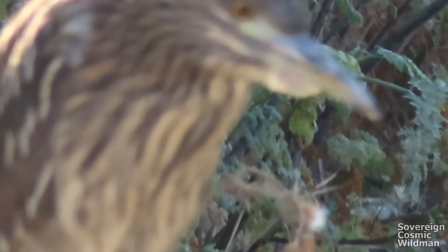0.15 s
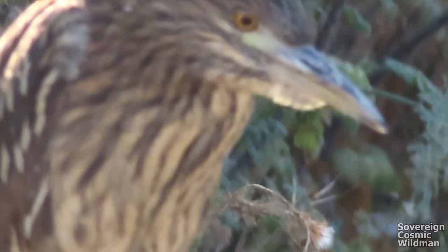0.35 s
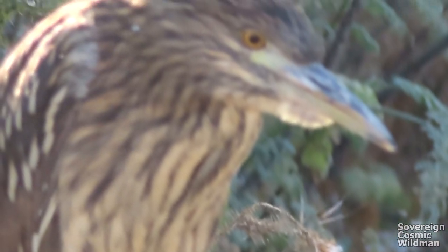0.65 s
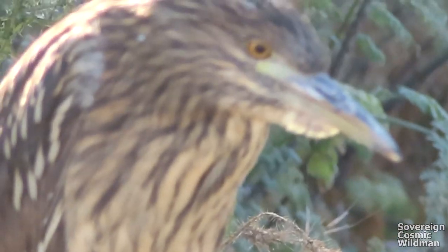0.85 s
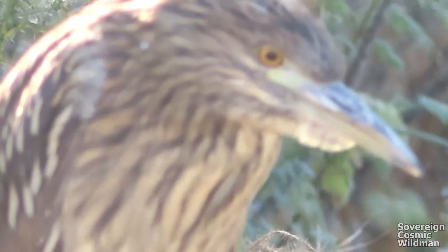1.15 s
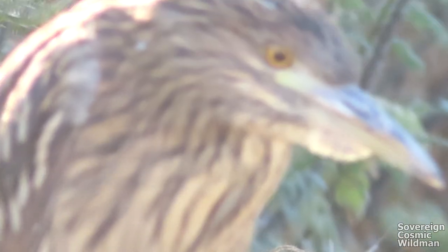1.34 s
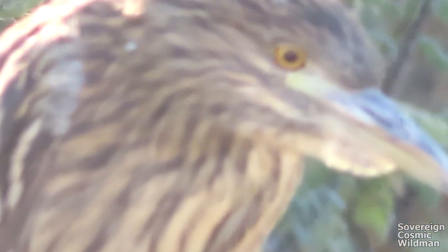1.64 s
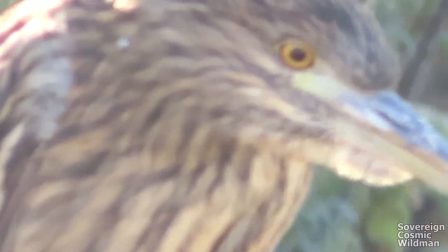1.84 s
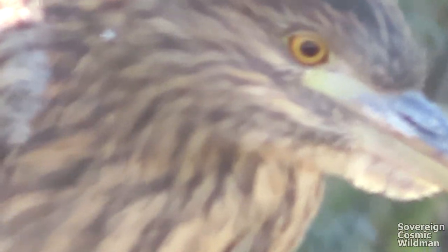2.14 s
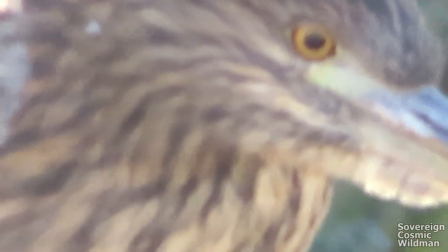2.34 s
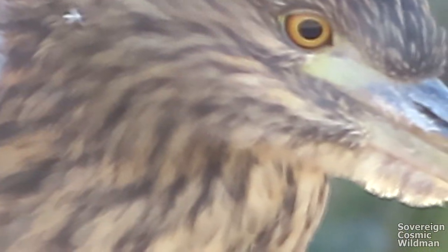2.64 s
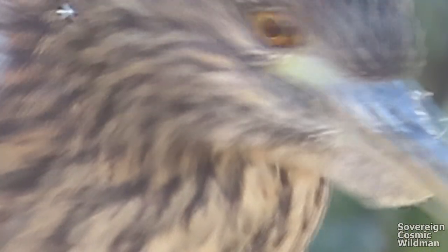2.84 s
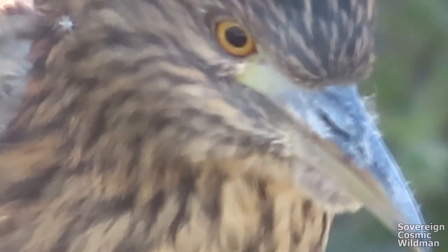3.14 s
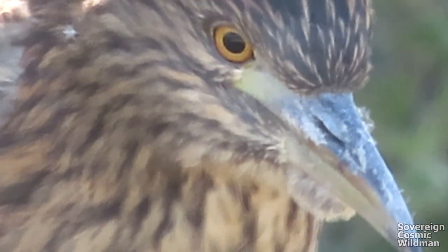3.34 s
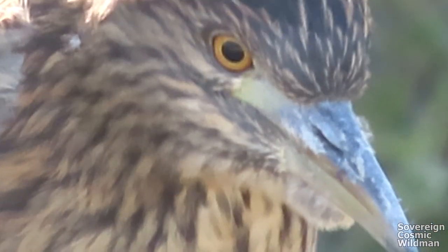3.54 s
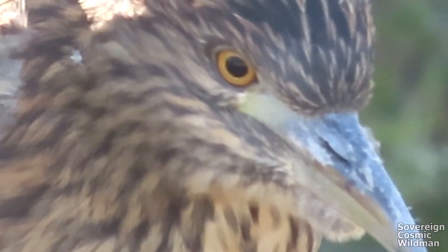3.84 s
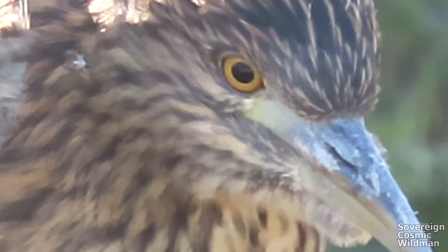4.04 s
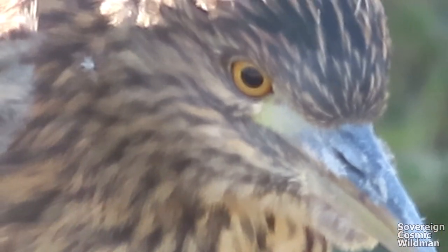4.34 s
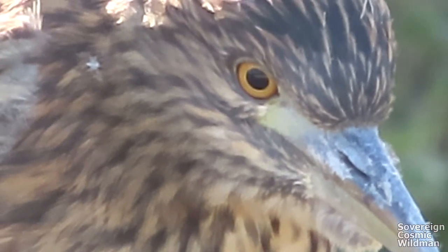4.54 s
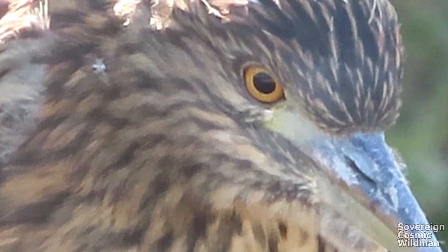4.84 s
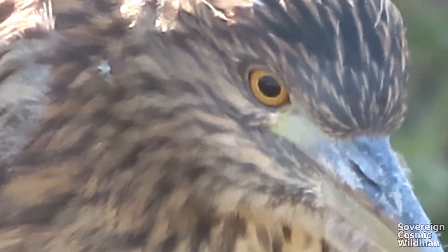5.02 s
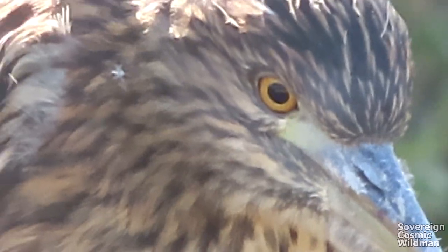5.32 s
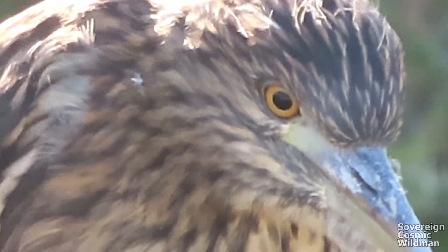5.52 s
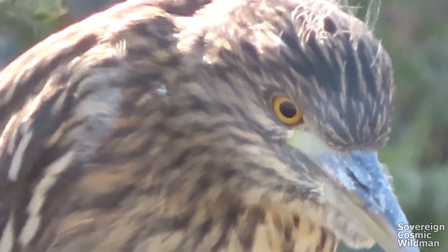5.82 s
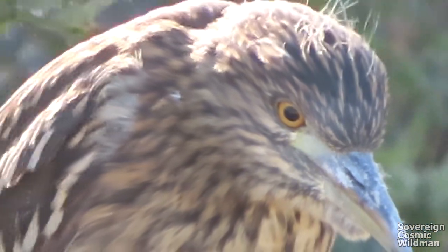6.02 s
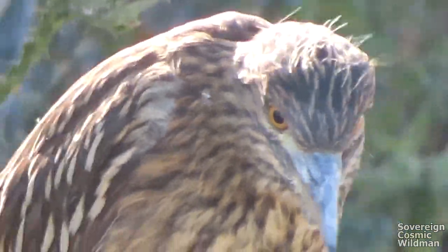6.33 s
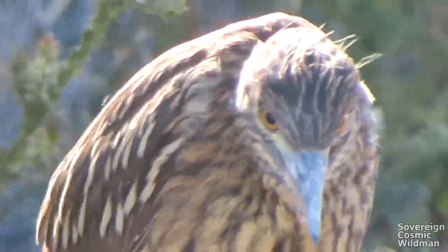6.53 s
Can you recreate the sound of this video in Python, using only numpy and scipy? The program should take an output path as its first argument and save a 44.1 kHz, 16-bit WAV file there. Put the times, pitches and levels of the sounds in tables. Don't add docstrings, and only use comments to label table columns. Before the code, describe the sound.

Zoom motor whine with gear clicks stops in a sharp snap, then faint ticking and bird chirps over a steady distant engine rumble.

```python
import sys
import numpy as np
from scipy import signal
from scipy.io import wavfile

SR = 44100
rng = np.random.default_rng(int(sys.argv[2]) if len(sys.argv) > 2 else 0)


def gain_from_decibels(decibels):
    exponent = np.asarray(decibels, float) / 20
    return 10 ** exponent


def digitize_waveform(pressure):
    field = np.atleast_2d(pressure).T
    bounded = np.clip(field, -1, 1)
    quanta = np.round(bounded * 32767).astype(np.int16)
    wavfile.write(sys.argv[1], SR, quanta)


N = 294367


def unit(x):
    return x / np.sqrt(np.mean(x ** 2) + 1e-20)


def in_time(rows):
    s, *columns = np.transpose(rows)
    return [np.interp(np.arange(N) / SR, s, c) for c in columns]


def at_hz(points, hz):
    points = np.array(points)
    return np.interp(np.log(hz), np.log(points[:, 0]), points[:, 1])


def drift(rate):
    r = np.exp(-80 * np.pi * rate / SR)
    white = rng.standard_normal(N // 40 + 2002)
    slow = signal.lfilter([1], [1, -2 * r, r * r], white)[2000:]
    return np.interp(np.arange(N) / 40, np.arange(len(slow)), unit(slow))


def resonate(x, peaks):
    out = 0
    for k, (hz, width, top_db) in enumerate(peaks):
        r = np.exp(-np.pi * width / SR)
        a = [1, -2 * r * np.cos(2 * np.pi * hz / SR), r * r]
        b = [(1 - r * r) / 2, 0, (r * r - 1) / 2]
        out = out + (-1) ** k * gain_from_decibels(top_db) * signal.lfilter(b, a, x)
    return out


def ring(pushes, modes):
    out = 0
    for k, (hz, level_db, t60) in enumerate(modes):
        r, w = gain_from_decibels(-60 / (t60 * SR)), 2 * np.pi * hz / SR
        b, a = [0, gain_from_decibels(level_db) * np.sin(w)], [1, -2 * r * np.cos(w), r * r]
        out = out + (-1) ** k * signal.lfilter(b, a, pushes + 1e-18)
    return out


def soften(x, hz):
    return signal.sosfilt(signal.butter(2, hz, fs=SR, output="sos"), x)


def pan(x, left_db):
    return x * gain_from_decibels(np.array([[left_db / 2], [-left_db / 2]]))


# time in seconds, speed in cycles per second.
SPEED = [(0.0, 23.8), (.5, 23.6), (1.0, 23.4), (1.75, 23.4), (2.6, 23.25), (3.4, 23.42), (4.0, 23.47),
         (6.0, 23.46), (6.68, 23.35)]
# time in seconds, base level of the orders in dB.
ENGINE = [(0.0, -42.5), (.62, -43), (.8, -41), (1.5, -42.5), (2.0, -42), (5.6, -41.5), (6.68, -41)]
# multiple of the cycle rate, level in dB.
ORDER_DB = [(1, -40), (2, 2), (3, -6), (4, -8), (5, -1), (6, -3), (7, -8.5), (8, -30.5), (9, -36),
            (10, -62), (11, -13.5), (12, -40), (13, -23.5)]


def engine():
    (hz,), (level_db,) = in_time(SPEED), in_time(ENGINE)
    cycle = 2 * np.pi * (np.cumsum(hz) / SR + 0.304)
    orders = np.zeros(N)
    for k, db in ORDER_DB:
        level = gain_from_decibels(db + 0.32 * min(k, 6) * drift(2.6))
        offset = 0.034 * k * drift(1.7) - 1.16 * (k in (4, 6))
        orders += level * np.cos(k * cycle + offset)
    return -np.sqrt(2) * gain_from_decibels(level_db) * orders


# frequency in Hz, width in Hz, level in dB.
WHINE = [(1480, 28, 3), (1687, 50, -2.5), (757, 71, 2.5)]


def zoom_drive():
    t = np.arange(N) / SR
    stop_s, fade_s, jerk_s = .337, .025, .029
    stop_db = -40 * np.clip((t - stop_s) / fade_s, 0, 5)
    jerk_db = 7.5 * np.clip(1 - (stop_s - t) / jerk_s, 0, 1)
    whine_db = -48.5 - 14 * t + jerk_db + stop_db
    whine = soften(unit(resonate(rng.standard_normal(N), WHINE)), 2500)
    rumble = unit(resonate(rng.standard_normal(N) * gain_from_decibels(1.3 * drift(21)), [(290, 380, 0)]))
    return gain_from_decibels(whine_db) * whine + gain_from_decibels(-56.5 + stop_db) * rumble


# start in seconds, peak in dB, ring in Hz, low thud in dB.
TEETH = [(0.016, -33, 857, 4), (0.044, -34, 730, -5), (0.075, -33.5, 870, -1), (0.113, -36, 755, -3),
         (0.149, -34.5, 970, 6.5), (0.164, -36, 810, -7), (0.196, -33, 732, -3), (0.215, -36, 1090, -1),
         (0.277, -34.5, 810, -3), (0.298, -38, 694, -2), (0.318, -33.5, 750, 3), (0.343, -31.5, 777, 6.5),
         (0.368, -36, 996, -20)]


def gear_teeth():
    out, t = np.zeros(N), np.arange(round(.04 * SR)) / SR
    swell = 1 - np.exp(-t / 0.00061)
    for s, db, hz, thud_db in TEETH:
        i = round(s * SR)
        tick = np.sin(2 * np.pi * hz * t) * np.exp(-t / 0.0039)
        thud = gain_from_decibels(thud_db) * np.sin(2 * np.pi * 340 * t) * np.exp(-t / 0.0036)
        out[i:i + len(t)] += gain_from_decibels(db + 3.5) * swell * (tick + thud)
    return out


def contacts(events, modes, gain_db, lasting_s, crunch, soft_hz, crack_db):
    low, upper, n = np.zeros(N), np.zeros(N), round(.015 * SR)
    fade = np.exp(-np.arange(n) / (lasting_s * SR))
    bursts = rng.standard_normal((len(events), n)) * crunch * fade
    for (s, db, upper_db), burst in zip(events, bursts):
        i = round(s * SR)
        blow = gain_from_decibels(db + gain_db) * np.append(1, burst[1:])
        low[i:i + n] += blow * np.append(1, np.full(n - 1, .4))
        upper[i:i + n] += blow * gain_from_decibels(upper_db)
    crack = gain_from_decibels(crack_db) * soften(upper + 1e-18, 2740)
    return soften(ring(low, modes[:1]) + ring(upper, modes[1:]), soft_hz) + crack


FOCUS_TICKS = [2, 5, 8, 11, 14, 17, 19, 22, 25, 28, 31, 33, 36, 38, 41, 43, 46, 48, 51, 53, 56, 58]
FOCUS_DB = [-36, -40, -33, -42, -36, -39, -37, -36, -36, -45, -35.5, -37, -32, -35, -32, -36.5, -36, -35,
            -34.5, -35.5, -37, -37.5]
# frequency in Hz, level in dB, t60 in seconds.
SHELL = [(438.6, 1, 0.1), (860, 5.5, 0.032), (952, 1, 0.03), (1112, 0.5, 0.016), (1820, -7.5, 0.03),
         (2820, -12, 0.036)]


def focus_steps():
    clock_start_s, tick_s, upper_db = .624, .03343, -41
    events = [(clock_start_s + tick_s * k, db, upper_db - db) for k, db in zip(FOCUS_TICKS, FOCUS_DB)]
    return contacts(events, SHELL, gain_db=-1.5, lasting_s=0.012, crunch=0.036, soft_hz=2200, crack_db=14)


# start in seconds, peak in dB, upper
# modes in dB.
TOUCHES = [(.392, -41.5, 6), (.624, -37.5, 5.5), (1.444, -48, 8), (2.216, -46.5, 6), (2.785, -37.5, 3),
           (3.165, -41, 5.5), (3.271, -36.5, -0.5), (4.358, -45, 8.5), (4.393, -44, 5.5), (4.45, -38.5, 2),
           (4.473, -36, -2), (4.655, -47.5, 10), (4.735, -49, 9.5), (4.898, -41.5, 7), (5.091, -37.5, 3.5),
           (5.387, -37.5, -3)]


def hand_touches():
    return contacts(TOUCHES, SHELL, gain_db=-1.0, lasting_s=0.0042, crunch=0.03, soft_hz=1640, crack_db=8)


# frequency in Hz, level in dB, t60 in seconds.
CAP = [(424, 11.5, 0.042), (694, -4, 0.006), (867, 3.5, 0.041), (1110, 4, 0.0077), (1394, 2, 0.011),
       (1620, 3.5, 0.0085), (2050, -7.5, 0.011), (2750, -9.5, 0.012), (3450, -9.5, 0.012),
       (4360, -10.5, 0.0042), (5360, -14, 0.009), (7230, -26, .006)]


def finger_rub():
    t = np.arange(N) / SR - .4135
    press_db = np.interp(t, [0, .003, .034, .052], [-32, 0.5, -1.5, -23])
    on = ((t > 0) & (t < .052)) * gain_from_decibels(press_db)
    since = np.clip(t, 0, .034)
    slips = np.diff(np.floor(412 * np.arange(N) / SR), prepend=0) * gain_from_decibels(2.2 * rng.standard_normal(N))
    grit = 0.16 * rng.standard_normal(N)
    low = ring(slips * on * gain_from_decibels(-44 - 130 * since), CAP[:1])
    mid = soften(ring((slips + grit) * on * gain_from_decibels(-37.5 - 200 * since), CAP[1:7]), 2800)
    high = grit * on * gain_from_decibels(-51.5 + 400 * since)
    return low + mid + soften(ring(high, CAP[7:]) + 1.4 * high, 4100)


# start in seconds, peak in dB, upper modes in dB.
SNAP = [
    (.4435, -42.5, 15),
    (.4682, -39, 9),
    (.4696, -27.5, 7.5),
    (.4712, -29.5, 5.5),
    (.4805, -41, 11),
]


def switch_snap():
    return contacts(SNAP, CAP, gain_db=-6.0, lasting_s=0.0059, crunch=0.13, soft_hz=4600, crack_db=13)


def whistles(calls, edge_s, second_db, rough_db, warble):
    out, flutter, waver = np.zeros(N), gain_from_decibels(rough_db * drift(90)), 1 + warble * drift(80)
    for rows in calls:
        s, hz, db = np.transpose(rows)
        i = np.arange(round(s[0] * SR), min(round(s[-1] * SR), N))
        t = i / SR
        phase = 2 * np.pi * np.cumsum(np.interp(t, s, hz) * waver[i]) / SR
        ends = np.clip(np.minimum(t - s[0], s[-1] - t) / edge_s, 0, 1)
        tone = np.sin(phase) + gain_from_decibels(second_db) * np.sin(2 * phase)
        out[i] += np.sqrt(2) * gain_from_decibels(np.interp(t, s, db)) * ends * tone
    return out * flutter


def glides(notes, peak, in_db, out_db):
    calls = []
    for s, d, a, b, db in notes:
        top = (s + peak * d, a + peak * (b - a), db)
        calls.append([(s, a, db - in_db), top, (s + d, b, db - out_db)])
    return calls


# start in seconds, length in seconds, base in Hz, top in Hz, level in dB.
FLIPS = [(3.307, 0.016, 2890, 3750, -45.5), (4.039, 0.015, 3100, 3450, -52),
         (4.873, 0.025, 2800, 4900, -44), (5.058, .01, 2800, 3200, -62), (6.656, 0.016, 3060, 3460, -49)]


def flicks():
    calls = []
    for s, d, base, top, db in FLIPS:
        top_db = db - 23 * np.log2(top / base)
        calls.append([(s, base, db - 2), (s + .5 * d, top, top_db), (s + d, base, db)])
    return calls


# start in seconds, from in Hz, held in Hz, level in dB, fade in dB.
STEPS_DOWN = [(3.324, 2830, 2390, -50, 5), (3.47, 2750, 2300, -59, -5), (4.052, 3130, 2640, -45.5, 26),
              (4.897, 2870, 2600, -40, 15.5), (5.064, 2800, 2360, -53.5, 6)]


def steps_down():
    calls, shares, length_s = [], [0, .44, .83, 1], .087
    for s, start, held, db, fade_db in STEPS_DOWN:
        tune = [start, held / .99, held * .99, held * .82]
        calls.append([(s + share * length_s, hz, db - share * fade_db) for share, hz in zip(shares, tune)])
    return calls


# start in seconds, length in seconds, from in Hz, to in Hz, level in dB.
SLIDES = [
    (3.235, .052, 3720, 2570, -47),
    (3.962, .06, 3780, 2720, -51),
]
# time in seconds, pitch in Hz, level in dB.
LONG_WHISTLE = [(2.528, 3300, -59), (2.546, 3780, -62), (2.57, 3620, -65), (2.606, 3620, -61),
                (2.666, 2995, -55), (2.716, 2930, -54), (2.788, 3210, -52), (2.818, 3180, -63),
                (2.855, 2400, -66)]
LOUD_SLIDE = [(4.797, 3950, -64), (4.804, 3600, -51.5), (4.83, 3135, -42.5), (4.855, 3000, -41.5),
              (4.86, 2400, -53)]
HIGH_CALL = [(5.653, 4850, -66), (5.664, 3950, -54), (5.708, 4450, -60), (5.735, 4360, -59),
             (5.752, 4350, -63), (5.76, 4650, -66)]
HOOK = [(6.39, 2290, -60), (6.403, 2490, -50), (6.409, 3040, -44), (6.42, 2460, -46.5), (6.436, 2150, -55),
        (6.475, 2430, -45.5), (6.485, 2403, -50)]


def near_bird():
    calls = glides(SLIDES, peak=.62, in_db=14, out_db=7) + flicks() + steps_down()
    calls = calls + [LONG_WHISTLE, LOUD_SLIDE, HIGH_CALL, HOOK]
    return whistles(calls, edge_s=0.0014, second_db=-35, rough_db=2.5, warble=0.011)


# start in seconds, length in seconds,
# from in Hz, to in Hz, level in dB.
FAR_NOTES = [(.755, 0.055, 2330, 2260, -54.5), (2.24, 0.064, 2230, 2330, -59),
             (2.305, .03, 2950, 2830, -59), (2.31, 0.019, 3580, 3520, -59), (2.425, .035, 3730, 3750, -63),
             (2.668, .055, 2060, 2000, -59), (2.67, .04, 3350, 3750, -68), (2.71, .04, 3750, 3320, -69),
             (2.79, 0.053, 1940, 1970, -61), (3.944, .013, 2600, 2450, -55), (3.944, .012, 5100, 4950, -62),
             (6.12, .05, 2050, 2060, -56), (6.18, 0.13, 2045, 2040, -63.5)]
# start in seconds, length in seconds, from in Hz, to in Hz, level in dB.
HOARSE_NOTES = [(.958, 0.047, 2390, 2230, -59), (1.155, 0.053, 2700, 2590, -59),
                (1.195, .15, 2520, 2280, -59.5), (4.45, 0.052, 3550, 3800, -67.5),
                (5.31, 0.064, 3700, 3600, -68.5), (5.5, .06, 3650, 3750, -69)]


def far_birds():
    clear = glides(FAR_NOTES, peak=.36, in_db=1, out_db=9)
    hoarse = glides(HOARSE_NOTES, peak=.4, in_db=-1.5, out_db=4.0)
    far = whistles(clear, edge_s=0.0042, second_db=-40, rough_db=3.5, warble=0.0063)
    return far + whistles(hoarse, edge_s=0.009, second_db=-40, rough_db=6.0, warble=0.03)


def foliage(x):
    lags = (rng.uniform(0.0041, .04, (2, 6)) * SR).astype(int)
    return np.array([sum(gain_from_decibels(-22 - 110 * lag / SR) * np.roll(x, lag) for lag in side) for side in lags])


def birds():
    near, far = near_bird(), far_birds()
    out = pan(near + far, .6) + foliage(near + 1.8 * far)
    out[1] = np.roll(out[1], 2)
    return out


# time in seconds, pitch in Hz, level in dB.
HOOT = [
    (6.09, 266, -63),
    (6.122, 280, -43.5),
    (6.174, 278, -44.5),
    (6.24, 278, -59),
]


def hoot():
    return whistles([HOOT], edge_s=.02, second_db=-13, rough_db=.8, warble=.003)


# start in seconds, length in seconds, level in dB.
BRUSHES = [
    (2.065, .025, -60),
    (4.46, 0.035, -70),
]


def rustle():
    grains = rng.standard_normal((2, N)) * gain_from_decibels(3.5 * drift(80))
    t, edge_s, level = np.arange(N) / SR, .05, 0
    for s, d, db in BRUSHES:
        level = level + gain_from_decibels(np.interp(t - s, [-edge_s, 0, d, d + edge_s], [-99, db, db - 6, -99]))
    return level * unit(resonate(grains, [(2400, 590, 3), (3700, 550, -8)]))


def hand_cover():
    return np.clip(1 - (np.arange(N) / SR - .36) / .11, 0, 1)


# frequency in Hz, width in Hz, level in dB.
HOUSING = [(437, 40.7, 0), (819, 85, 0), (955, 124, 1), (1085.4, 110, -3.5), (1663, 56, -15.5),
           (1707, 47, -10), (1868, 31, -15.5), (3000, 440, -30.5), (6760, 340, -32)]


def motor_hiss(covered):
    shared, own = rng.standard_normal((2, N)) * gain_from_decibels(1.75 * drift(28))
    hiss = unit(resonate(np.array([shared, shared + 0.34 * own]), HOUSING))
    return gain_from_decibels(-46.5 - 4.5 * covered) * hiss


# frequency in Hz, spectral level in dB per Hz.
WASH = [(20, -3.5), (32, -5.5), (55, -7.5), (85, -4), (170, -8), (300, -16.5), (600, -24.5), (1200, -24.5),
        (2200, -34), (4000, -38), (6000, -43), (9000, -50), (12000, -57.5), (15500, -59.5)]
# frequency in Hz, correlation from -1 to 1.
LIKENESS = [(60, 1), (130, 1), (290, 0.81), (640, 0.95), (1410, 0.53), (3100, 0.34), (6000, 0.3),
            (9000, -0.32), (15000, 0.41)]


def traffic(covered):
    out, together, edges = 0, drift(3.0), 18 * 2 ** np.arange(0, 10.1, .5)
    white = rng.standard_normal((2, 2, N))
    for k, (low, high) in enumerate(zip(edges, edges[1:])):
        band = signal.butter(2, [low, high], "band", fs=SR, output="sos")
        mid, side = signal.sosfilt(band, white[k % 2])
        hz = np.sqrt(low * high)
        alike = np.clip(at_hz(LIKENESS, hz), -1, 1)
        flicker_db = np.clip(1.3 - .2 * np.log2(hz / 100), .25, 1.3) * drift(9)
        shade_db = -3 * covered * np.clip(np.log2(hz / 600), 0, 1)
        gain = gain_from_decibels(at_hz(WASH, hz) + shade_db + 0.75 * together + flicker_db)
        out = out + gain * (np.sqrt(1 + alike) * mid + np.sqrt(1 - alike) * side * [[1], [-1]])
    return gain_from_decibels(-41.5) * unit(out)


# time in seconds, level in dB.
TYRES = [
    (0, -79),
    (5.6, -65.5),
    (6.68, -58),
]


def tyres():
    return gain_from_decibels(in_time(TYRES)[0]) * unit(resonate(rng.standard_normal(N), [(1282, 36, 0)]))


def scene():
    covered = hand_cover()
    drives = pan(motor_hiss(covered) + zoom_drive() + gear_teeth(), 4.8)
    steps = pan(focus_steps() + hand_touches(), 3.6)
    switch = pan(finger_rub() + switch_snap(), 5.0)
    camera = drives + steps + switch
    return engine() + traffic(covered) + tyres() + hoot() + birds() + camera + rustle()


def band_limit(x):
    return signal.sosfilt(signal.butter(12, 15630, fs=SR, output="sos"), x)


def record(dry):
    mid, side = (dry[0] + dry[1]) / 2, (dry[0] - dry[1]) / 2
    side = signal.sosfilt(signal.butter(2, 270, "high", fs=SR, output="sos"), side)
    mix = np.array([mid + side, mid - side])
    return band_limit(mix)


dry = scene()
out = record(dry)
digitize_waveform(out)
```